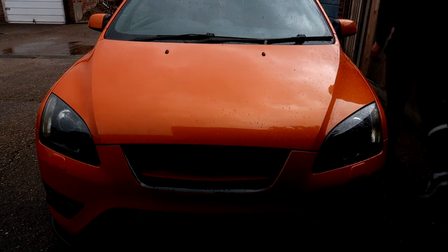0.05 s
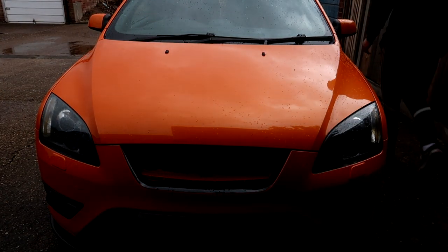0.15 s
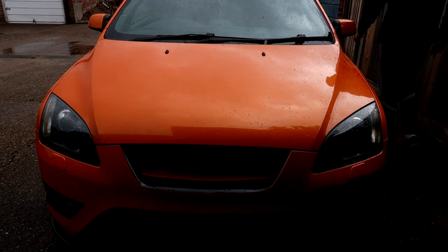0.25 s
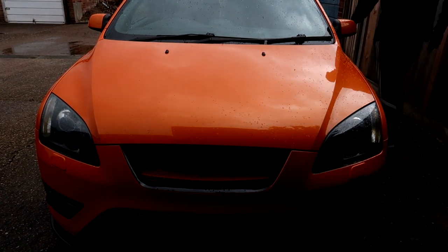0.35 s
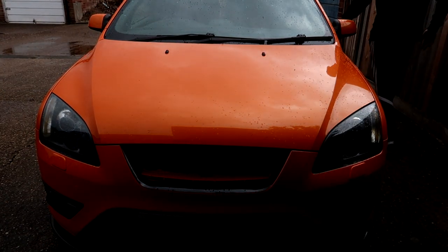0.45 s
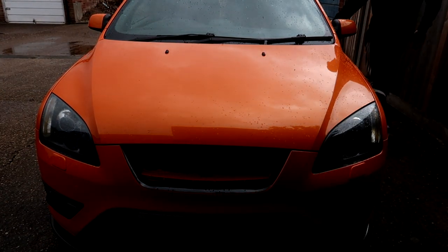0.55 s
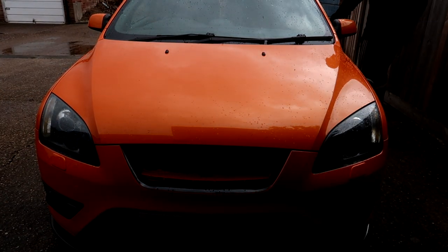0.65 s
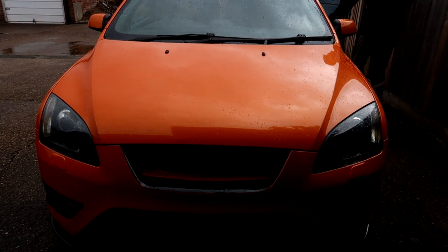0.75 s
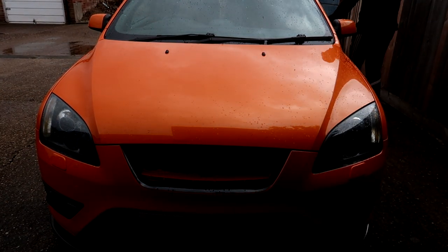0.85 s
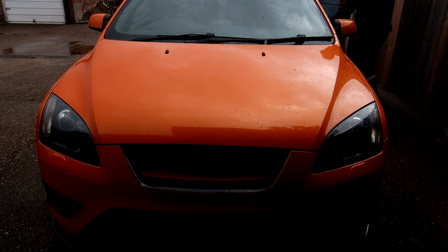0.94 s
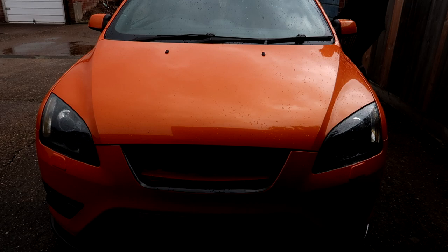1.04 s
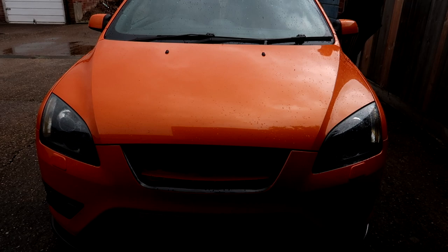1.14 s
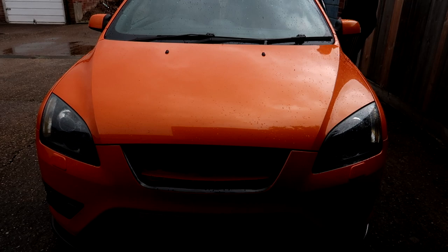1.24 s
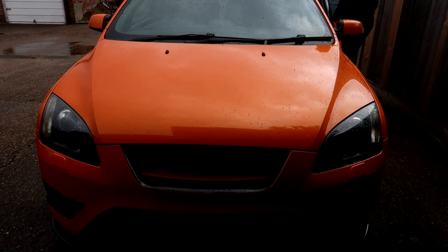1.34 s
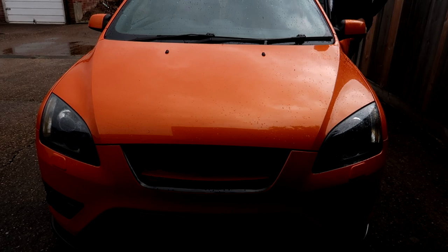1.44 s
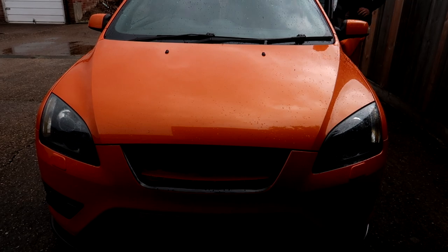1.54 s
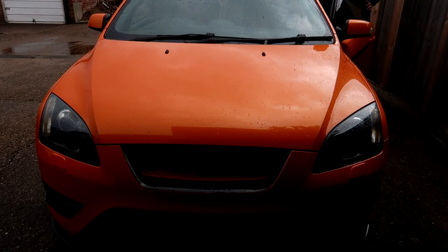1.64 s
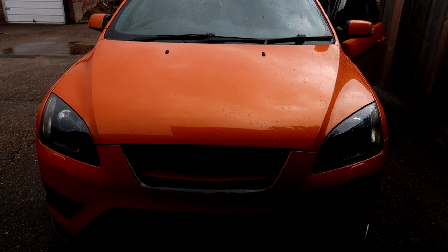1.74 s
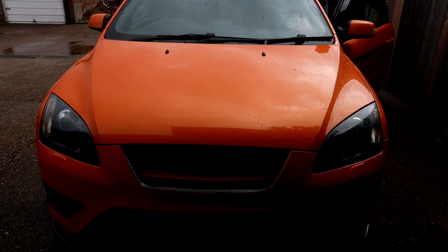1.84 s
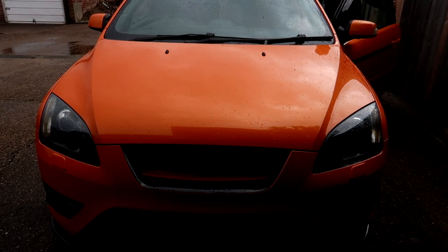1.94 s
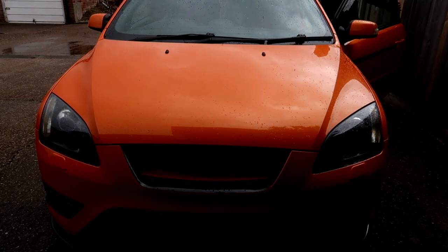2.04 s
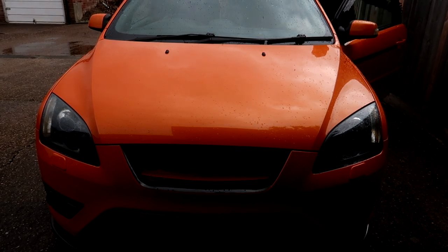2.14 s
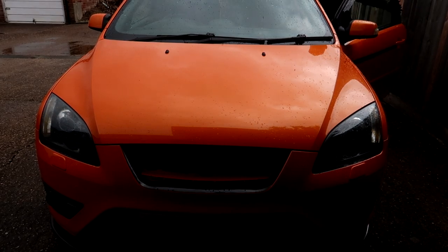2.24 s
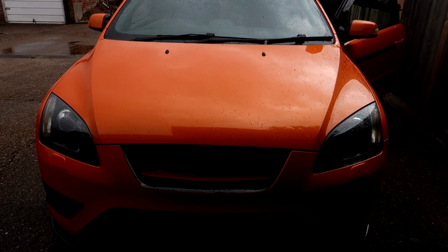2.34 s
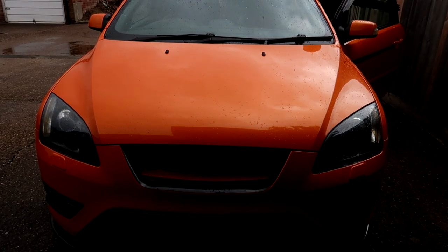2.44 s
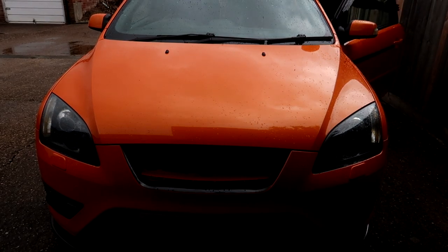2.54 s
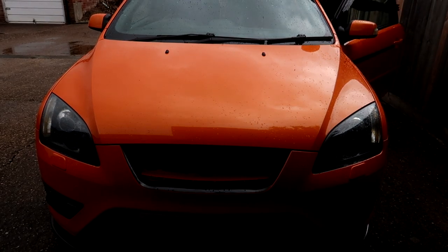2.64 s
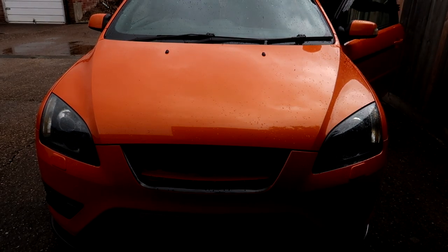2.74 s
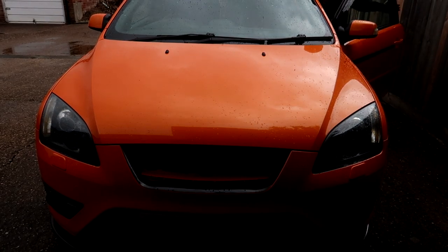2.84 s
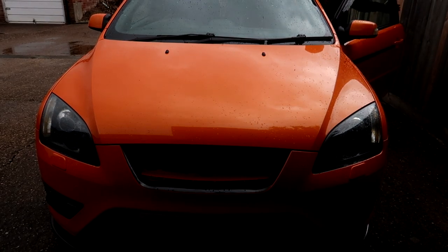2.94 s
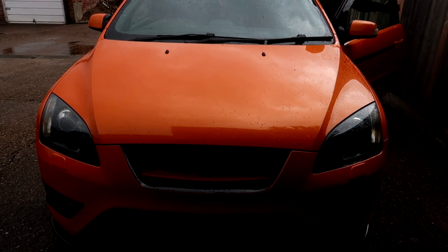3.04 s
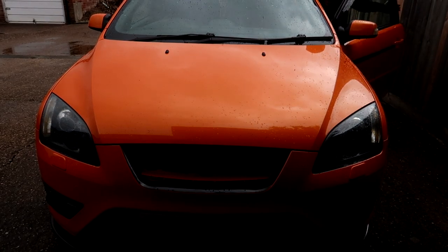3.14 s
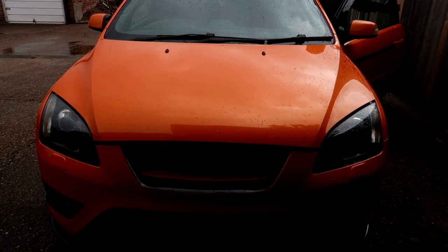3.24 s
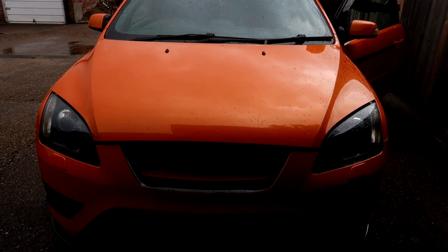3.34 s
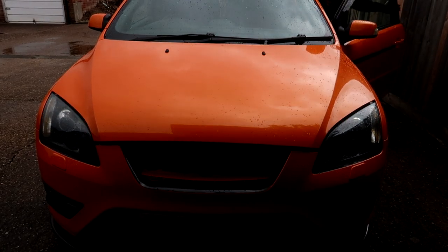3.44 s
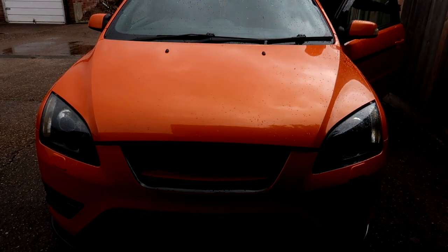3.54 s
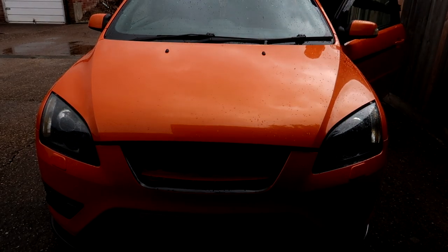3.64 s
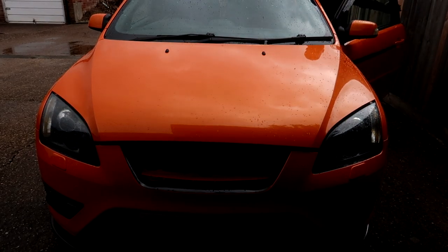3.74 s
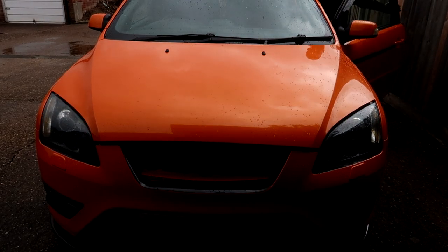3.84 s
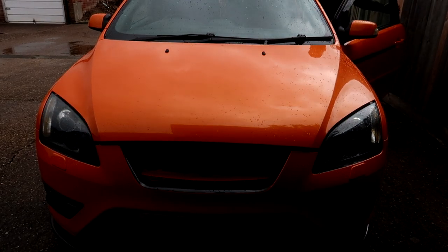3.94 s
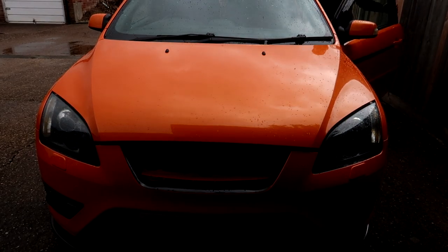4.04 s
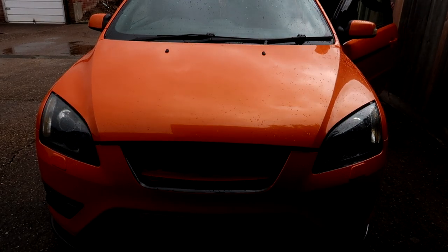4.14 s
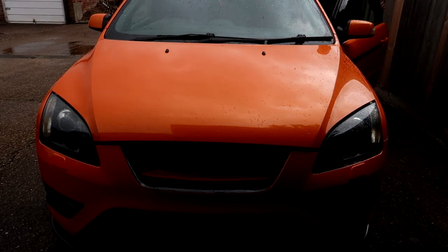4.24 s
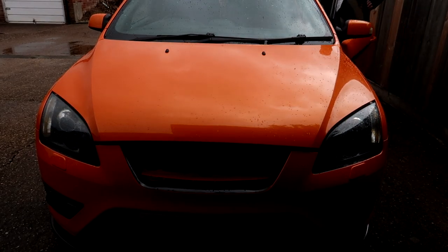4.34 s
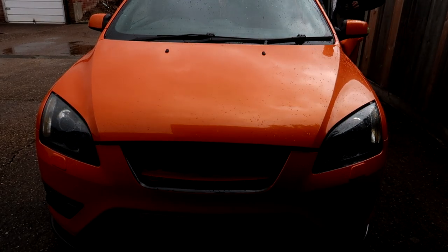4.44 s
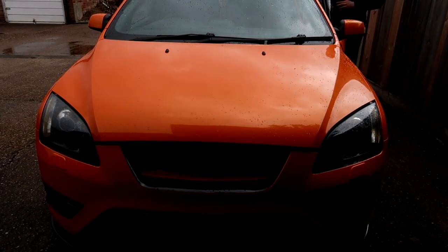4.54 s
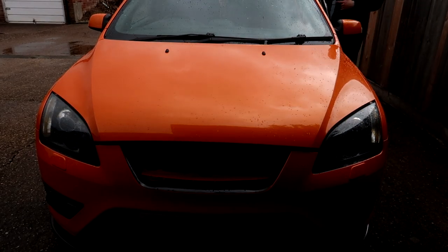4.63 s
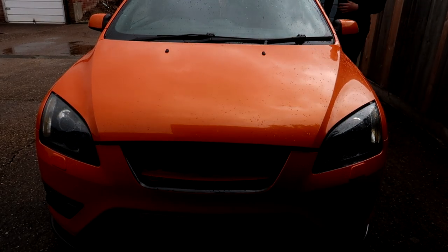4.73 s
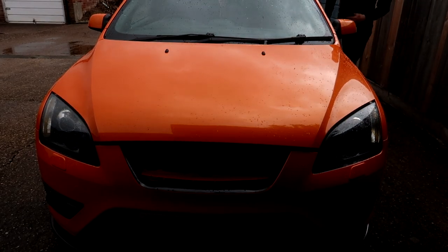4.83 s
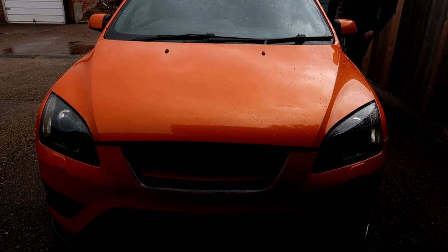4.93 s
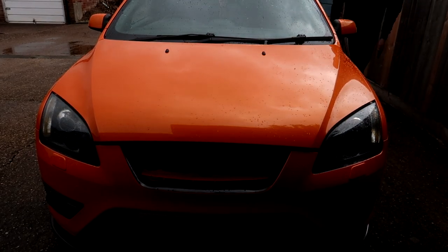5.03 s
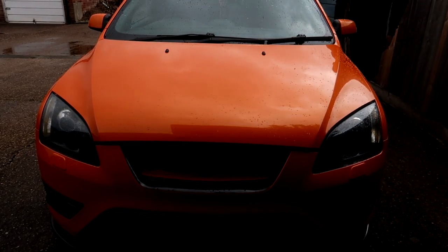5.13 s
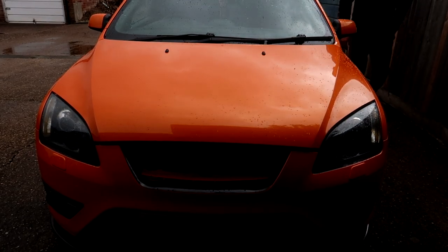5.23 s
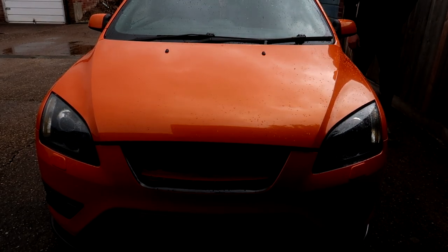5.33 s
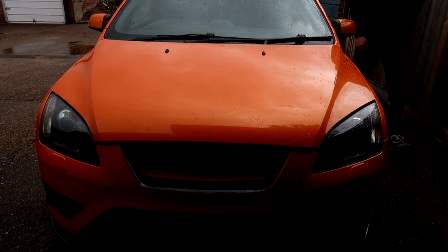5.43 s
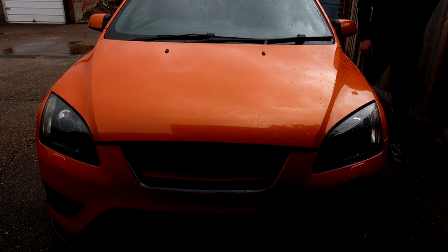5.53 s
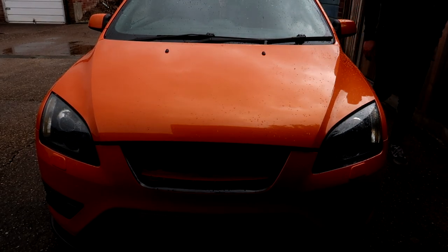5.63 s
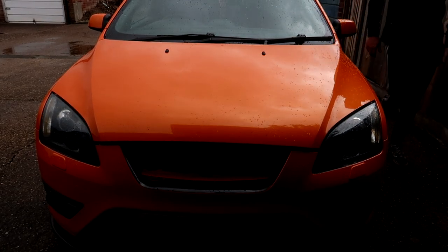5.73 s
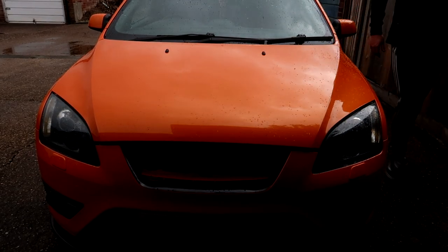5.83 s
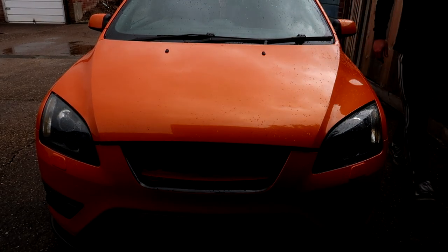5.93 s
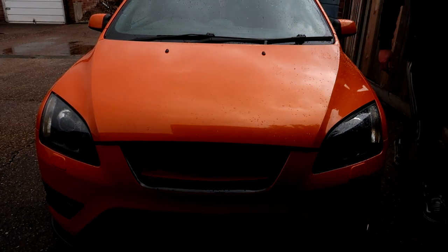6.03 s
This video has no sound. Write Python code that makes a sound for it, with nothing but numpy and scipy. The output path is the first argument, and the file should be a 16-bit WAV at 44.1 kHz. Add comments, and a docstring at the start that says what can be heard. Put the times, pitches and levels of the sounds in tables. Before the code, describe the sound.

Gritty footsteps, a car door handle clacks and the door opens, a bonnet pops with a metallic clank, then the door slams with a boom.

```python
"""A gritty driveway, with a parked car: someone walks along it, opens the door, leans in, pulls the bonnet release.
The bonnet jumps off its latch with a steel clank; the door slams and booms through the cabin; steps return.
Metal parts are sums of decaying modes plus coloured noise; grit is granular noise; thuds are smooth pulses.
Fence and house give a short echo over a low outdoor rumble; the recorder's gain control ducks on loud peaks."""
import sys
import numpy as np
from scipy import signal
from scipy.fft import rfft, irfft, next_fast_len
from scipy.io import wavfile
from scipy.ndimage import uniform_filter1d, minimum_filter1d

SR = 44100
rng = np.random.default_rng(int(sys.argv[2]) if len(sys.argv) > 2 else 0)


def dump(signal):
    """Clip the signal to [-1, 1] and save it as 16-bit WAV at the path in sys.argv[1]."""
    limited = np.clip(np.atleast_2d(signal).T, -1, 1)
    pcm = np.round(limited * 32767).astype(np.int16)
    wavfile.write(sys.argv[1], SR, pcm)


N = 268039
TIME = np.arange(N) / SR
RING_S = np.arange(32768) / SR  # time axis of one event
BAND_HZ = 25 * 2 ** (np.arange(29) / 3)  # third-octave centres


def undb(db):
    """Decibels to amplitude gain."""
    return 10 ** (np.asarray(db) / 20)


def at(points, hz):
    """Read (f/Hz, value) points on a log-frequency axis."""
    f, value = np.transpose(points)
    return np.interp(np.log(hz + 1e-9), np.log(f), value)


def unit(x):
    """Scale to rms 1."""
    return x / np.sqrt(np.mean(x ** 2, axis=-1, keepdims=True) + 1e-30)


def burst(x, db):
    """Give a short sound the energy of 50 ms at this rms level."""
    return x * undb(db) * np.sqrt(.05 * SR / np.sum(x ** 2))


def fade(t60):
    """Exponential decay, 60 dB in t60 seconds."""
    return np.exp(-np.log(1000) * RING_S / t60)


def add(track, s, x):
    """Mix x into the track at time s."""
    i = int(s * SR)
    track[i:i + len(x)] += x[:N - i]


def walk(rate_hz):
    """Slow random curve: normal draws at this rate, joined by straight lines."""
    knots = rng.standard_normal(int(N / SR * rate_hz) + 2)
    return np.interp(TIME * rate_hz, np.arange(len(knots)), knots)


def coloured(x, points, tilt_db=0):
    """Minimum-phase filter with this spectrum, tilted by dB per octave above 500 Hz."""
    size = next_fast_len(len(x) + len(x) // 8, True) // 2 * 2
    hz = np.maximum(np.fft.rfftfreq(size, 1 / SR), 20)
    level_db = at(points, hz) + tilt_db * np.log2(np.maximum(hz, 500))
    # folding the cepstrum makes the response causal
    cepstrum = irfft(np.log(undb(level_db)))
    cepstrum[1:size // 2] *= 2
    cepstrum[size // 2 + 1:] = 0
    return irfft(rfft(x, size) * np.exp(rfft(cepstrum)))[:len(x)]


def dull(x, hz):
    """First-order low-pass: a softer contact loses the treble."""
    return signal.sosfilt(signal.butter(1, hz, fs=SR, output="sos"), x)


def ring(modes, size=32768):
    """Free vibration after one blow; neighbouring modes swing opposite ways."""
    t = RING_S[:size]
    total = np.zeros(size)
    for k, (hz, db, t60) in enumerate(modes):
        decay = np.exp(-np.log(1000) * t / t60)
        total += (-1) ** k * undb(db) * decay * np.sin(2 * np.pi * hz * t)
    return total


def clatter(colour, t60):
    """Decaying coloured noise: countless short-lived modes of loosely joined parts."""
    return coloured(rng.standard_normal(len(RING_S)) * fade(t60), colour)


def contact(rise_s):
    """Onset: a blow takes a moment to spread through the metal."""
    return 1 - np.exp(-RING_S / rise_s)


def struck(blows, modes, colour, rise_s):
    """Each blow clatters and rings its part; added damping cuts the ring short. Gives (clatter, ring)."""
    out, tone = np.zeros((2, N)), ring(modes)
    onset = contact(rise_s)
    for s, clatter_db, t60, soft_hz, ring_db, damped_t60 in blows:
        rattle = dull(clatter(colour, t60) * onset, soft_hz)
        ringing = dull(tone * fade(damped_t60) * onset, soft_hz)
        add(out[0], s, burst(rattle, clatter_db))
        add(out[1], s, burst(ringing, ring_db))
    return out


def spread(mid, side, width):
    """Left and right from two unrelated signals; width sets side minus mid per band."""
    side_share = 1 / (1 + undb(-at(width, BAND_HZ)) ** 2)
    mid = coloured(mid, np.column_stack([BAND_HZ, 10 * np.log10(1 - side_share)]))
    side = coloured(side, np.column_stack([BAND_HZ, 10 * np.log10(side_share)]))
    return np.array([mid + side, mid - side])


# background spectrum: [f/Hz, level/dB per Hz]
OUTDOORS_COLOUR = [(15, -28), (25, -7), (71, -0.5), (98, -0.5), (167, -7), (278, -10), (383, -12.5),
                   (655, -13.5), (1060, -17.5), (1850, -23.5), (11200, -42), (15000, -74)]
# background side minus mid: [f/Hz, level/dB]
OUTDOORS_WIDTH = [(60, -43), (110, -27), (200, -13), (380, -8), (1000, -10), (2400, -4), (4400, -1),
                  (12000, 2)]
OUTDOORS_DB = -48.5


def outdoors():
    """Far-off town rumble and faint hiss: coloured stereo noise with a slight slow swell."""
    mid, side = (coloured(rng.standard_normal(N), OUTDOORS_COLOUR) for _ in range(2))
    swell_db = .4 * walk(3)
    return unit(spread(mid, side, OUTDOORS_WIDTH)) * undb(OUTDOORS_DB + swell_db)


# cloth on the seat, end levels held: [t/s, level/dB]
RUSTLE_LEVEL = [(1.5, -61), (1.75, -62), (2.05, -54), (2.25, -55), (2.45, -59), (2.65, -84.5)]
# cloth spectrum: [f/Hz, level/dB per Hz]
CLOTH_COLOUR = [(200, 0.5), (900, 11), (2000, 5), (4000, 3), (8000, -5), (11000, -3), (14000, -29)]


def rustle():
    """Cloth rubs unevenly: flickering noise, strongest as someone leans into the car."""
    flutter_db = 1.3 * walk(30)
    level_db = np.interp(TIME, *np.transpose(RUSTLE_LEVEL)) + flutter_db
    return unit(coloured(rng.standard_normal(N), CLOTH_COLOUR)) * undb(level_db)


def crunch(rise_s, t60, grain_db=4.5):
    """Grit under a sole: tiny clicks of very unequal size that swell and die away."""
    sizes = np.repeat(undb(grain_db * rng.standard_normal(len(RING_S) // 32)), 32)
    swell = np.minimum(RING_S / rise_s, 1)
    decay = np.exp(-np.log(1000) * np.maximum(RING_S - rise_s, 0) / t60)
    return rng.standard_normal(len(RING_S)) * sizes * swell * decay


# soles sliding over grit: [t/s, level/dB, tilt/dB per octave, rise/s]
SCUFFS = [(.085, -46.5, -1.5, 0.019), (.36, -49, -3.5, 0.017), (0.446, -44.5, -5, 0.023),
          (.54, -39, -1, 0.012), (1.322, -50.5, -1.5, 0.017), (2.355, -48, -2.5, 0.019),
          (3.654, -52.5, 0, 0.014), (4.1, -51.5, -1, 0.046), (5.584, -53.5, 3, 0.022),
          (5.844, -54, -2, 0.013), (6.049, -50, -3.5, 0.023)]
SCUFF_T60_S = 0.38
# stones cracking under a heel: [t/s, level/dB]
CRACKS = [(0.02, -49), (.521, -38.5), (.534, -41), (1.165, -60), (2.376, -56), (3.751, -70), (4.452, -50),
          (5.627, -56.5), (5.861, -67), (5.996, -61.5)]
CRACK_RISE_S, CRACK_T60_S, CRACK_TILT_DB_PER_OCTAVE = 0.0017, 0.08, 0.15
# grit spectrum: [f/Hz, level/dB per Hz]
GRIT_COLOUR = [(80, 0), (250, -2.5), (600, -1), (1000, -3), (2200, -5), (4500, -7), (7000, -7),
               (11500, -10.5), (13500, -27), (16000, -52)]
# spectrum of a sole twisting on the spot: [f/Hz, level/dB per Hz]
TWIST_COLOUR = [(150, -24), (450, -4), (950, -1.5), (2400, -2), (3800, -11), (9000, -16), (12000, -11),
                (14500, -39)]
TWIST_S, TWIST_DB, TWIST_RISE_S, TWIST_T60_S = 4.43, -39, 0.061, 0.18  # before the slam


def steps():
    """Soles slide, crack single stones and twist once on the spot, catching and slipping."""
    out = np.zeros(N)
    for s, db, tilt_db, rise_s in SCUFFS:
        add(out, s, burst(coloured(crunch(rise_s, SCUFF_T60_S), GRIT_COLOUR, tilt_db), db))
    for s, db in CRACKS:
        grit = crunch(CRACK_RISE_S, CRACK_T60_S)
        add(out, s, burst(coloured(grit, GRIT_COLOUR, CRACK_TILT_DB_PER_OCTAVE), db))
    catching = undb(3.5 * walk(160)[:len(RING_S)])
    twist = crunch(TWIST_RISE_S, TWIST_T60_S, grain_db=2) * catching
    add(out, TWIST_S, burst(coloured(twist, TWIST_COLOUR), TWIST_DB))
    return out


# trim and loose stones: [t/s, level/dB, centre f/Hz]
KNOCKS = [(.024, -50, 780), (.234, -61.5, 3740), (1.335, -55.5, 2000), (3.558, -49.5, 620),
          (3.7515, -44, 1640), (3.7515, -54.5, 2900), (3.7515, -53, 840), (4.42, -52, 1300),
          (4.452, -44.5, 2210), (4.493, -44, 1190), (4.496, -44.5, 2250), (4.518, -55, 2270),
          (4.541, -58, 2260), (5.582, -49.5, 2770), (5.627, -50.5, 1920), (5.862, -50.5, 700),
          (5.863, -57, 4100), (5.996, -50, 910)]
KNOCK_OCTAVES, KNOCK_T60_S, KNOCK_TOP_HZ = 0.31, 0.15, 9000


def knocks():
    """Light contacts, each a noise burst with one broad resonance."""
    out = np.zeros(N)
    hz = np.geomspace(20, SR / 2, 400)
    for s, db, centre_hz in KNOCKS:
        hump_db = -15 * np.log10(1 + (np.log2(hz / centre_hz) / KNOCK_OCTAVES) ** 2)
        knock = clatter(np.column_stack([hz, hump_db]), KNOCK_T60_S) * contact(rise_s=0.00014)
        add(out, s, burst(knock, db))
    return signal.sosfilt(signal.butter(4, KNOCK_TOP_HZ, fs=SR, output="sos"), out)


# rubber soles: [t/s, length/s, level/dB, pitch f/Hz]
SQUEAKS = [(0.059, 0.052, -49, 655), (0.373, 0.056, -54, 1290), (0.525, 0.019, -45, 6460),
           (0.622, 0.04, -47, 664)]


def squeaks(waver=0.014, sag=0.043):
    """Rubber sticks and slips at a nearly steady pitch, which sags as the squeak swells and stops."""
    out = np.zeros(N)
    for s, length_s, db, hz in SQUEAKS:
        u = np.minimum(RING_S / length_s, 1)
        pitch_hz = hz * (1 + sag * (.5 - u) + waver * walk(144)[:len(u)])
        tone = np.sin(2 * np.pi * np.cumsum(pitch_hz) / SR)
        add(out, s, burst(tone * np.sqrt(u * (1 - u)), db))
    return out


# something loose underfoot: [t/s, length/s, level/dB, pitch factor]
CREAKS = [(0.456, .035, -47, 0.83), (0.497, .02, -49, 0.93), (0.519, .02, -39.5, 1.03),
          (0.561, .025, -42, 1.0), (0.624, .045, -49.5, 1.03)]
# its modes: [f/Hz, level/dB, t60/s]
CREAK_MODES = [(430, -5, 0.088), (662, 2, 0.055), (829, -1.5, 0.064), (980, 5, 0.091), (1092, 2.5, 0.089),
               (1565, 0.5, 0.084), (1760, -1, 0.049), (2157, -2, 0.072), (2680, -10, 0.067),
               (2855, -11, 0.066)]
SLIPS_PER_S, SLIP_SCATTER_DB, SLIP_PITCH_SCATTER = 150, 0.5, 0.017  # mean rate


def creaks(count=16):
    """Uneven slips ring a loose piece; its pitch shifts with the load on it and from slip to slip."""
    out = np.zeros(N)
    for s, length_s, db, pitch in CREAKS:
        gaps_s = rng.uniform(.3, 1.7, count) / SLIPS_PER_S
        slip_times = np.cumsum(gaps_s) - gaps_s[0]
        slips = np.zeros(N)
        for after_s, (size, bend) in zip(slip_times, rng.standard_normal((count, 2))):
            if after_s <= length_s:
                factor = pitch * (1 + SLIP_PITCH_SCATTER * bend)
                modes = [(hz * factor, mode_db, t60) for hz, mode_db, t60 in CREAK_MODES]
                add(slips, after_s, undb(SLIP_SCATTER_DB * size) * ring(modes, size=6000))
        add(out, s, burst(slips, db))
    return out


# handle linkage modes: [f/Hz, level/dB, t60/s]
HANDLE_MODES = [(341, 5.5, .23), (621, 9, 0.2), (709, 10, 0.085), (1008, -0.5, 0.21), (1497, -4, 0.18),
                (1790, -10, 0.16), (2120, -4.5, 0.18), (2410, -0.5, 0.12), (2840, -9, .18),
                (3530, -3.5, 0.16), (4301, -4, 0.14), (4640, -8, .1), (5720, -5, .1)]
RODS_S, RODS_LENGTH_S, RODS_DB, RODS_PITCH_SCATTER = .921, .125, -35.5, .08
RODS_FADE_DB, RODS_SCATTER_DB, RODS_TILT_DB_PER_OCTAVE = 13, 4, 2.5


def rods(count=48):
    """Loose rods chatter: many small uneven, weakening contacts, each ringing the linkage its own way."""
    out = np.zeros(len(RING_S))
    draws = rng.standard_normal((count, 3 + len(HANDLE_MODES)))
    for k, (jitter, size, bend, *touch) in enumerate(draws):
        share = (k + 1 + np.tanh(jitter)) / count
        pitch = 1 + RODS_PITCH_SCATTER * bend
        modes = []
        for (hz, db, t60), d in zip(HANDLE_MODES, touch):
            mode_db = db + RODS_SCATTER_DB * d + RODS_TILT_DB_PER_OCTAVE * np.log2(hz / 1000)
            modes.append((hz * pitch, mode_db, t60 / 2))
        gain = undb(RODS_SCATTER_DB * size - RODS_FADE_DB * share)
        add(out, share * RODS_LENGTH_S, gain * ring(modes, size=4000))
    return out


# slack taken up, linkage tripped, rods rattling: [t/s, clatter level/dB, low-pass f/Hz]
HANDLE_CLACKS = [(.917, -42.5, 9000), (.9215, -34.5, 9000), (.931, -43, 14100), (.938, -40, 6000),
                 (.956, -38, 13000), (.983, -43.5, 6000), (.998, -46.5, 4000), (1.016, -50, 5000)]
# handle clatter spectrum: [f/Hz, level/dB per Hz]
HANDLE_COLOUR = [(100, -1), (400, 2), (750, -4.5), (1200, -0.5), (2500, -4), (4500, -13.5), (8000, -5),
                 (12000, -1.5), (13500, -13), (16000, -30)]
HANDLE_T60_S, HANDLE_RING_DB, HANDLE_DAMPED_T60_S = 0.091, -1, 0.77  # ring re clatter


def handle():
    """Separate contacts ring the handle linkage, over the chatter of its rods. Gives (clatter, ring)."""
    clacks = [(s, db, HANDLE_T60_S, soft_hz, db + HANDLE_RING_DB, HANDLE_DAMPED_T60_S)
              for s, db, soft_hz in HANDLE_CLACKS]
    out = struck(clacks, HANDLE_MODES, HANDLE_COLOUR, rise_s=0.00046)
    add(out[0], RODS_S, burst(rods(), RODS_DB))
    return out


def thud(push_s):
    """A panel bulges and comes back: one smooth pulse of air."""
    u = np.pi / 2 * (RING_S / push_s - 2)
    return (1 - 2 * u ** 2) * np.exp(-u ** 2)


# cabin air and body shell: [f/Hz, level/dB, t60/s]
CABIN_MODES = [(44, 6, 0.73), (64.4, 4, 0.57), (79.5, -7.5, 0.41), (103, -17, 0.25), (118.2, 2.5, 0.86),
               (156, 1.5, 0.3), (189.6, -9, 0.43), (217.7, -2, 0.34), (243.6, 0, .25)]


def boom(tones, push_s):
    """A push feeds best the cabin modes whose half period is about its length."""
    ratio = np.array(CABIN_MODES)[:, 0] * push_s * 2
    return (ratio / (1 + ratio ** 2)) ** 3 @ tones


# shell panel spectrum: [f/Hz, level/dB per Hz]
SHELL_COLOUR = [(25, -37), (45, 5.5), (78, 2.5), (100, 3.5), (125, 3), (180, -7), (260, -11), (500, -13),
                (1500, -70)]


def flutter(push_s, t60):
    """The shell panels shake; a short push has no depth."""
    no_depth = signal.butter(3, 1 / (4 * push_s), "high", fs=SR, output="sos")
    return signal.sosfilt(no_depth, clatter(SHELL_COLOUR, t60))


# pushes from door seal, stay, release lever, slam and its bounces:
# [t/s, thud level/dB, push length/s, boom level/dB, flutter level/dB]
THUMPS = [(1.045, -32, 0.0052, -32, -29.5), (1.076, -34.5, 0.0038, -38, -34.5),
          (1.133, -36, 0.0043, -45, -42), (1.487, -43, 0.0027, -43, -48), (1.539, -37, 0.0028, -45, -52),
          (3.2255, -45, 0.0015, -40, -35.5), (4.064, -49, 0.003, -48, -61),
          (4.885, -16.5, 0.0049, -11.5, -23.5), (4.908, -14, 0.0076, -18, -19.5),
          (4.946, -20.5, 0.0037, -24.5, -22), (4.964, -13.5, 0.0053, -30, -19.5),
          (5.07, -27, 0.0075, -36, -40), (5.108, -35, 0.007, -44, -37), (5.179, -48, 0.0065, -35, -43)]
FLUTTER_T60_S, RUMBLE_DB, RUMBLE_T60_S = 0.18, -12, 1  # rumble re flutter


def cabin():
    """Each slow push thuds, sets the cabin humming and shakes the panels, which rumble on."""
    out, tones = np.zeros(N), np.array([ring([mode]) for mode in CABIN_MODES])
    for s, thud_db, push_s, boom_db, flutter_db in THUMPS:
        add(out, s - push_s, burst(thud(push_s), thud_db))
        add(out, s, burst(boom(tones, push_s), boom_db))
        add(out, s, burst(flutter(push_s, FLUTTER_T60_S), flutter_db))
        add(out, s, burst(flutter(push_s, RUMBLE_T60_S), flutter_db + RUMBLE_DB))
    return out


# unlatching, drop into the stay, two lock stages, trim jolts as the door settles:
# [t/s, clatter level/dB, low-pass f/Hz, skin ring level/dB]
DOOR_BLOWS = [(1.0464, -37, 895, -37.5), (1.057, -35, 700, -35), (1.078, -53, 400, -43),
              (1.099, -45, 500, -49), (1.137, -44.5, 900, -47.5), (1.473, -45.5, 900, -49),
              (1.4826, -28, 1600, -25), (1.512, -37.5, 1000, -43), (1.539, -38, 700, -37.5),
              (4.8694, -27.5, 3500, -33), (4.881, -18.5, 1920, -27), (4.914, -25.5, 1700, -27),
              (4.931, -28.5, 1700, -39), (4.951, -30.5, 2500, -43), (4.973, -39, 5000, -41),
              (5.003, -42.5, 3500, -42), (5.046, -44.5, 4000, -37), (5.074, -42.5, 500, -36.5),
              (5.106, -48, 900, -44.5), (5.179, -59, 890, -48.5)]
# door skin: [f/Hz, level/dB, t60/s]
DOOR_MODES = [(124.2, 1, 0.77), (146.7, 0, 0.19), (175.6, -2, 0.4), (280.7, -3.5, 0.32), (328.1, 6, 0.28),
              (362.6, 1, 0.42), (400.6, 2, 0.18), (429.6, 3.5, 0.32), (477, -6.5, 0.51), (581, -4.5, 0.38),
              (612, -4, 0.37), (728, -9, 0.56), (787, 3, 0.19)]
# door clatter spectrum: [f/Hz, level/dB per Hz]
DOOR_COLOUR = [(25, -37), (70, 0), (130, 0.5), (220, -10.5), (350, -1.5), (600, -2), (1000, -3.5),
               (1600, -10), (2300, -11.5), (3100, -16), (4500, -23), (8000, -24), (11000, -23.5),
               (14000, -52)]
DOOR_CLATTER_T60_S, DOOR_DAMPED_T60_S = 0.13, 0.55
# steel stay: [f/Hz, level/dB, t60/s]
STAY_MODES = [(874, 6, 0.14), (906, 1, 0.21), (1228, -9, 0.16), (1310, -3, 0.16), (1566, -18, 0.32),
              (1707, -15.5, 0.26), (1910, -17, 0.23), (2492, -18, 0.21), (2910, -15, .14), (3340, -23, 0.1)]
STAY_S, STAY_DB = 1.4835, -28.5
# lock striker: [f/Hz, level/dB, t60/s]
STRIKER_MODES = [(920, -8, 0.091), (1030, 5, 0.097), (1178, 2, 0.16), (1337, 1, 0.13), (1547, 6, 0.19),
                 (1630, -4, 0.19), (1950, -8, 0.24), (2850, -20, 0.36), (3100, -17, 0.28)]
STRIKER_S, STRIKER_DB = 4.881, -21.5
# glass and trim rattling on after the slam
RATTLE_S, RATTLE_DB, RATTLE_T60_S, RATTLE_LOWPASS_HZ = 4.953, -32.5, 0.54, 3500


def door():
    """Blows clatter and ring the skin; stay and striker clang; the trim rattles. Gives (clatter, ring)."""
    blows = [(s, db, DOOR_CLATTER_T60_S, soft_hz, ring_db, DOOR_DAMPED_T60_S)
             for s, db, soft_hz, ring_db in DOOR_BLOWS]
    out = struck(blows, DOOR_MODES, DOOR_COLOUR, rise_s=0.0013)
    add(out[1], STAY_S, burst(ring(STAY_MODES) * contact(rise_s=0.0014), STAY_DB))
    add(out[1], STRIKER_S, burst(ring(STRIKER_MODES) * contact(rise_s=0.0022), STRIKER_DB))
    jolts = undb(4.5 * walk(130)[:len(RING_S)])
    rattle = dull(clatter(DOOR_COLOUR, RATTLE_T60_S) * jolts, RATTLE_LOWPASS_HZ)
    add(out[0], RATTLE_S, burst(rattle, RATTLE_DB))
    return out


# hand finding the release lever: [t/s, level/dB]
LEVER_KNOCKS = [(2.249, -51), (2.262, -53.5), (2.372, -53), (2.379, -44.5), (2.39, -45), (2.418, -53)]
# lever and trim: [f/Hz, level/dB, t60/s]
LEVER_MODES = [(670, 3, 0.061), (818, -6, .05), (1242, -6, .07), (1643, -10, 0.082), (1960, -8, 0.091),
               (3380, -18, .05)]


def lever():
    """A hand knocks the plastic release lever and its trim, ringing their modes."""
    out, tone = np.zeros(N), ring(LEVER_MODES) * contact(rise_s=0.00045)
    for s, db in LEVER_KNOCKS:
        add(out, s, burst(tone, db))
    return out


def rebounds(s, db, ring_db, soft_hz, t60, gap_s, loss_db, ring_loss_db, duller, looser, damped_t60, count):
    """A part strikes repeatedly, each time weaker, duller and looser. Gives rows for struck()."""
    return [(s + k * gap_s, db - k * loss_db, t60 * looser ** k,
             soft_hz * duller ** k, ring_db - k * ring_loss_db, damped_t60)
            for k in range(count)]


# bonnet panel and catch: [f/Hz, level/dB, t60/s]
BONNET_MODES = [(73, -16, .45), (119.3, -9, .6), (176.8, -1.5, 0.74), (295, -2.5, 0.87), (325, 6.5, 0.23),
                (361.6, -1.5, 0.51), (382, -3.5, 0.57), (473, -11, 0.6), (584, -5, 0.7), (670, 4.5, .1),
                (891, 4.5, 0.21), (970, -4, 0.46), (1070, 3, 0.29), (1212, 2, 0.31), (1470, -2, 0.17),
                (1634, -8, 0.18), (2026, -2.5, 0.34), (2077, 1, .23), (2320, -9, .25), (2700, 0, .15),
                (2920, -6, 0.2), (3402, -22, 0.22), (4000, -10, .15), (4330, -9, 0.15), (4570, -26, 0.18),
                (5550, -22, .23), (5600, -17, .16)]
# bonnet clatter spectrum: [f/Hz, level/dB per Hz]
BONNET_COLOUR = [(30, -46), (70, -20), (170, -0.5), (240, -1.5), (320, 0), (560, -1), (740, -9), (930, 1.5),
                 (1250, -2), (1800, -3.5), (2080, -2), (2650, -5.5), (3000, -8.5), (3200, -13),
                 (3400, -8.5), (3700, -14), (4400, -9.5), (4900, -18), (5600, -14.5), (6100, -22),
                 (7000, -21.5), (12000, -24), (16000, -30)]
POP_S, POP_DB, POP_RING_DB = 3.2337, -22.5, -21
SHUDDER_AFTER_S, SHUDDER_DB, SHUDDER_T60_S, SHUDDER_LOWPASS_HZ = .012, -29.5, 0.23, 8970


def bonnet_pop():
    """Off its catch, the bonnet chatters on the safety hook, rings and shudders. Gives (clatter, ring)."""
    chatter = rebounds(POP_S, POP_DB, POP_RING_DB, soft_hz=14100, t60=0.019, gap_s=.00437, loss_db=3.9,
                       ring_loss_db=14, duller=0.76, looser=1.3, damped_t60=4.6, count=3)
    out = struck(chatter, BONNET_MODES, BONNET_COLOUR, rise_s=0.0027)
    shudder = dull(clatter(BONNET_COLOUR, SHUDDER_T60_S), SHUDDER_LOWPASS_HZ)
    add(out[0], POP_S + SHUDDER_AFTER_S, burst(shudder, SHUDDER_DB))
    return out


def noise_bands(size):
    """Third-octave bands of fresh noise."""
    full = next_fast_len(size, True)
    thirds = 3 * np.log2((np.fft.rfftfreq(full, 1 / SR) + 1e-9) / BAND_HZ[:, None])
    band_gain = np.sqrt(np.maximum(1 - abs(thirds), 0))
    return irfft(rfft(rng.standard_normal(full)) * band_gain, full)[:, :size]


# driveway echo re direct sound: [f/Hz, level/dB]
ECHO_LEVEL = [(50, -13.5), (150, -0.5), (400, -3.5), (1200, -9.5), (3000, -10), (11500, -8), (14000, -23)]
# echo decay: [f/Hz, t60/s]
ECHO_T60 = [(100, 0.72), (500, 0.41), (1500, .34), (4000, 0.29), (12000, 0.1)]


def echo(build_s=0.0014):
    """Scatter from fence, ground and house front: decaying noise whose treble dies first."""
    decay = np.array([fade(t60) for t60 in at(ECHO_T60, BAND_HZ)])
    build = 1 - np.exp(-(RING_S / build_s) ** 2)
    band_share = np.gradient(BAND_HZ) / (SR / 2)
    weight = undb(at(ECHO_LEVEL, BAND_HZ)) * np.sqrt(band_share / len(RING_S))
    return weight @ unit(noise_bands(len(RING_S)) * decay * build)


# echo side minus mid: [f/Hz, level/dB]
ECHO_WIDTH = [(60, -86), (200, -34), (500, -26), (1300, -8), (2400, -7.5), (5000, 7), (12000, 8)]


def place(hidden, panels, lag_s, pan_db, echo_db, panel_echo_db=-11):
    """Hidden parts feed the echo more than open panels; the left microphone hears all lag_s later."""
    scattered = undb(echo_db) * hidden + undb(panel_echo_db) * panels
    response = spread(echo(), echo(), ECHO_WIDTH)
    wet = signal.fftconvolve(scattered[None], response, axes=1)[:, :N]
    pan_gain = undb(np.array([[pan_db], [-pan_db]]) / 2)
    left, right = (hidden + panels) * pan_gain + wet
    size = next_fast_len(N + 64, True)
    delay = np.exp(-2j * np.pi * np.fft.rfftfreq(size, 1 / SR) * lag_s)
    return np.array([irfft(rfft(left, size) * delay, size)[:N], right])


def scene():
    """Bonnet about straight ahead; door and footsteps to the right; cabin central, without echo."""
    small = knocks() + squeaks() + creaks() + lever()
    lock, skin = handle() + door()
    latch, bonnet = bonnet_pop()
    beside = place(lock + steps() + small + rustle(), skin, lag_s=5e-5, pan_db=-0.85, echo_db=-1.5)
    ahead = place(latch, bonnet, lag_s=-0.000021, pan_db=0.3, echo_db=1.0)
    return outdoors() + beside + cabin() + ahead


def gain_control(x, limit_db=-12.0, hold_s=0.39, recover_db_per_s=22):
    """Loud peaks pull the gain down; it waits, then creeps back."""
    power = uniform_filter1d(np.mean(x ** 2, axis=0), size=256)
    over_db = np.maximum(10 * np.log10(np.maximum(power, 1e-12)) - limit_db, 0)
    half = int(hold_s * SR / 2)
    held_db = -minimum_filter1d(-over_db, 2 * half + 1, origin=half, mode="constant")
    recovery_db = recover_db_per_s * TIME
    cut_db = np.maximum.accumulate(held_db + recovery_db) - recovery_db
    return x * undb(-uniform_filter1d(cut_db, size=64))


def record(dry, low_hz=22, top_hz=16000):
    """The recorder sheds the lowest rumble, rides its gain, rounds the peaks and cuts the top."""
    x = signal.sosfilt(signal.butter(2, low_hz, "high", fs=SR, output="sos"), dry)
    rounded = np.tanh(gain_control(x))
    return signal.sosfilt(signal.ellip(8, .2, 80, top_hz, fs=SR, output="sos"), rounded)


dry = scene()
out = record(dry)
dump(out)
```